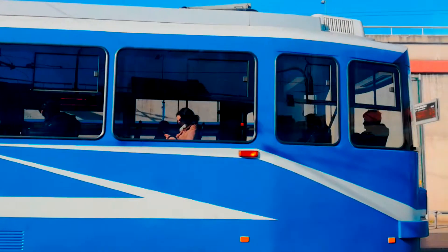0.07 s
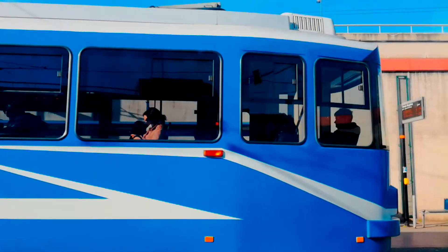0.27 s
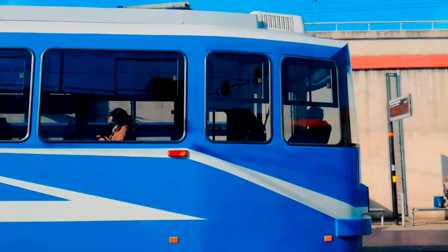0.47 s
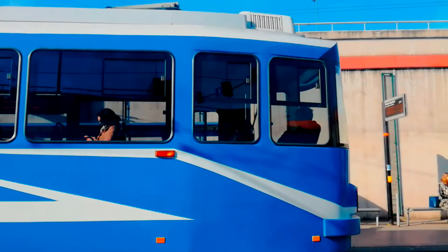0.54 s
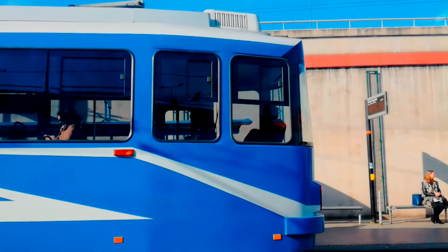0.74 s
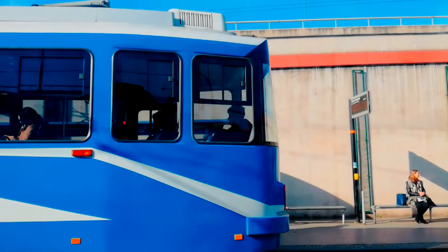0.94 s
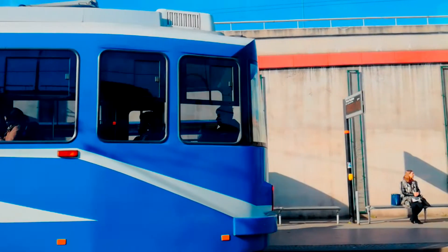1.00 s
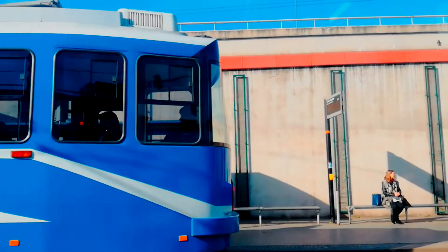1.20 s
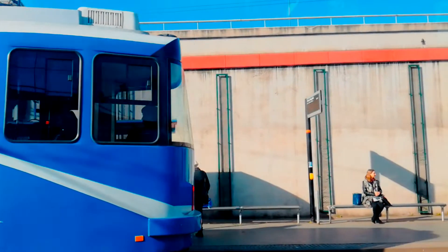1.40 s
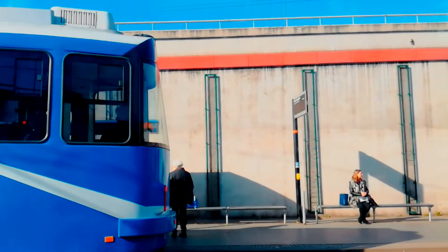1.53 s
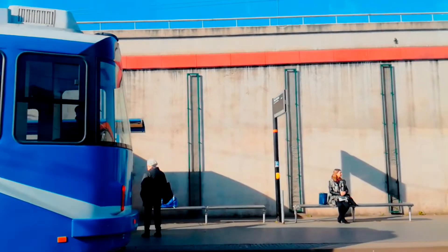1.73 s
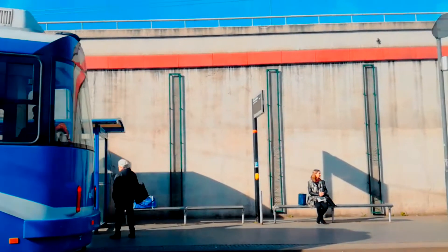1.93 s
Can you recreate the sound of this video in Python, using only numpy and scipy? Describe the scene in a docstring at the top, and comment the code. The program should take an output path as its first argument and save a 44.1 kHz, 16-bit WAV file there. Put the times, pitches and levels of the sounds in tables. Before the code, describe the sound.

A tram rumbles low and slowly on the left outdoors at a city stop; early on, a loud rattling clack hits very close to the right microphone, then a soft swish, and another later.

```python
"""Slow tram and a close clack

A tram rolls slowly on the left: shaped noise makes its low rumble, drone, rolling hiss and two short swishes.
Close on the right, contacts ring a damped part and loose parts rattle, so hard that the sound distorts.
Two sharp single-sample ticks fall among the contacts. The two microphones are a head's width apart:
the far one hears the sounds later and duller, but the ticks only fainter."""
import sys
import numpy as np
from scipy import signal
from scipy.fft import rfft, irfft, next_fast_len
from scipy.io import wavfile
from scipy.ndimage import map_coordinates

SR = 44100
rng = np.random.default_rng(int(sys.argv[2]) if len(sys.argv) > 2 else 0)


def pcm_store(signal):
    """Save signal as 16-bit PCM."""
    levels = np.round(np.clip(np.atleast_2d(signal), -1, 1) * 32767)
    wavfile.write(sys.argv[1], SR, levels.astype(np.int16).T)


N = 85995
TIME = np.arange(N) / SR


def amp(db):
    """Decibels to gain."""
    return 10 ** (np.asarray(db) / 20)


def unit(x):
    """Scale to rms 1."""
    return x / np.sqrt(np.mean(x ** 2) + 1e-20)


def along(points, hz):
    """Read a curve of (Hz, value) points on a log frequency axis."""
    point_hz, value = np.transpose(points)
    return np.interp(np.log(hz + 1), np.log(point_hz + 1), value)


def filtered(x, response):
    """Shape x by a complex response of frequency."""
    size = next_fast_len(N + SR // 2)
    spectrum = rfft(x, size) * response(np.fft.rfftfreq(size, 1 / SR))
    return irfft(spectrum, size)[..., :N]


def coloured(noise, spectrum):
    """Colour noise by a table of (Hz, dB) and scale it to rms 1."""
    return unit(filtered(noise, lambda hz: amp(along(spectrum, hz))))


def wobble(rate):
    """A smooth random curve, rate knots a second."""
    knots = rng.standard_normal(int(N * rate / SR) + 4)
    return map_coordinates(knots, [TIME * rate])


def swell(start, rise, fade_db_per_s):
    """A smooth rise in seconds, then a steady fade in dB."""
    t = TIME - start
    opening = np.sin(np.pi / 2 * np.clip(t / rise, 0, 1)) ** 2
    return opening * amp(-fade_db_per_s * np.maximum(t - rise, 0))


def grains(per_s):
    """Tiny impacts at random times and of random size."""
    return (rng.random(N) < per_s / SR) * rng.standard_normal(N)


EAR_LAG_S = .00054
BEND_HZ, BEND_RAD = 162, 0.91  # low sound bends round the head and lags further


def far_side(x, shadow):
    """The far microphone: sound travels round the head, so it is later and shadowed."""
    def response(hz):
        bend = BEND_RAD * hz ** 2 / (hz ** 2 + BEND_HZ ** 2)
        phase_lag = 2 * np.pi * hz * EAR_LAG_S + bend
        return amp(along(shadow, hz)) * np.exp(-1j * phase_lag)
    return filtered(x, response)


# The head's shadow on the far microphone for the tram. Each row: frequency in Hz, gain in dB.
TRAM_SHADOW = [(80, -0.76), (200, 1.5), (350, -2), (600, -6.5), (1100, -10), (2300, -16), (5000, -26.5),
               (12000, -14.5)]
# Likeness of the tram's noise at the two microphones. Each row: frequency in Hz, likeness from 0 to 1.
ALIKE = [(60, 1), (200, 1), (1000, 0.83), (5000, 0.88)]


def from_left(spectrum):
    """Coloured noise from the tram's side, rms 1 on the left and only partly alike on the right."""
    direct, diffuse = coloured(rng.standard_normal((2, N)), spectrum)
    alike = lambda hz: np.clip(along(ALIKE, hz), 0, 1)
    other = filtered(direct, alike) + filtered(diffuse, lambda hz: np.sqrt(1 - alike(hz) ** 2))
    return np.array([direct, far_side(other, TRAM_SHADOW)])


# Colour of the deep rumble. Each row: frequency in Hz, relative level in dB per Hz.
RUMBLE = [(15, -3), (35, 9), (52, -3.5), (70, -13), (125, -31.5), (400, -80)]
# Surges of the rumble. Each row: time in seconds, level in dB.
RUMBLE_LEVEL = [(0, -49), (.33, -46), (.72, -55), (.87, -47), (1.0, -59), (1.15, -51.5), (1.25, -54),
                (1.52, -50.5), (1.63, -42), (1.73, -51.5), (1.95, -51.5)]
# Colour of the steadier drone above it. Each row: frequency in Hz, relative level in dB per Hz.
DRONE = [(40, -21.5), (62, -0.5), (78, 2), (98, -4), (118, -18.5), (190, -19.5), (280, -30), (400, -35.5),
         (700, -66), (2000, -110)]
# Colour of the wheels' rolling noise. Each row: frequency in Hz, relative level in dB per Hz.
ROLLING = [(60, -20), (200, 2), (390, 1), (500, -4), (1150, -10.5), (2200, -23), (4700, -28), (7000, -39.5),
           (16000, -43)]
# Course of the rolling noise. Each row: time in seconds, level in dB.
ROLLING_LEVEL = [(0, -68.5), (.2, -70), (.6, -75), (.9, -75), (1.15, -76.5), (1.33, -76.5), (1.56, -78),
                 (1.638, -68), (1.73, -72), (1.95, -76)]
DRONE_DB, DRONE_FOLLOWS = -55, 0.18  # its middle level, and its share of the rumble's swings in dB


def tram():
    """The heavy body rumbles in surges under a steadier drone while the wheels roll on the rails."""
    rumble_db = np.interp(TIME, *np.transpose(RUMBLE_LEVEL))
    rolling_db = np.interp(TIME, *np.transpose(ROLLING_LEVEL))
    drone_db = DRONE_DB + DRONE_FOLLOWS * (rumble_db - rumble_db.mean())
    rumble = from_left(RUMBLE) * amp(rumble_db)
    drone = from_left(DRONE) * amp(drone_db)
    rolling = from_left(ROLLING) * amp(rolling_db + 0.41 * wobble(25))  # wavers slightly, in dB
    return rumble + drone + rolling


# Faint hum of the drive. Each row: frequency in Hz, rms level in dB.
HUM = [(253, -81), (393, -83), (1184, -95)]
HUM_WAVER_RAD = 0.91


def hum():
    """A few faint tones of the drive, each wavering in phase."""
    tones = np.zeros(N)
    for hz, db in HUM:
        phase = 2 * np.pi * hz * TIME + HUM_WAVER_RAD * wobble(4.1)
        tones += amp(db) * np.sqrt(2) * np.sin(phase)
    return np.array([tones, far_side(tones, TRAM_SHADOW)])


# Contacts of the clack. Each row: start in seconds, level in dB, contact time in ms.
CONTACTS = [(0.2308, -21.5, 3.7), (0.2362, -11.5, 0.76), (0.2418, -10.5, 0.4), (0.2484, -29.5, 0.2),
            (0.2503, -22, 1.5), (0.255, -32, 0.56), (0.2601, -22.5, 0.8), (0.2829, -29, 1.8),
            (0.2876, -23.5, 2.1), (0.2950, -25, 4.5)]
# Modes of the struck part. Each row: frequency in Hz, level in dB, time to fall 60 dB in seconds.
MODES = [(131, -18, 0.097), (199, -8, 0.032), (318.5, -16, 0.051), (372, -14, 0.026), (446, -19, 0.05),
         (531, -25, 0.047), (670, -22, 0.029), (755, -22, 0.023), (942, -23.5, 0.04), (1251, -13, 0.018),
         (1435, -19, 0.011), (1608, -26.5, 0.015), (1918, -24, 0.015), (2430, -33.5, 0.052),
         (3280, -31, 0.05), (4030, -39, 0.025)]
# Deep thuds of the clack. Each row: start in seconds, level in dB.
THUDS = [(0.2411, -10.5), (0.2741, -28), (0.2892, -31)]
CRACK_DB, CRACK_T60_S = -10.5, 0.026  # level of the white noise that is differenced into the crack
THUD_HZ, THUD_T60_S = 44, 0.031


def clack():
    """A quick run of contacts rings one damped part; its weight settles with deep thuds."""
    t = TIME[:SR // 4]
    ring = sum(amp(db - 60 * t / t60) * np.sin(2 * np.pi * hz * t) for hz, db, t60 in MODES)
    near = np.zeros(N)
    for start, db, contact_ms in CONTACTS:
        u = np.maximum(TIME - start, 0) / (contact_ms / 4000)  # force peaks a quarter of the way in
        force = u * np.exp(-u)
        bright_noise = np.diff(rng.standard_normal(len(t) + 1))
        crack = amp(CRACK_DB - 60 * t / CRACK_T60_S) * bright_noise
        near += amp(db) * signal.fftconvolve(force / force.sum(), ring + crack)[:N]
    for start, db in THUDS:
        age = np.maximum(TIME - start, 0)
        near -= amp(db - 60 * age / THUD_T60_S) * np.sin(2 * np.pi * THUD_HZ * age)
    return near


# Colour of the loose rattle. Each row: frequency in Hz, relative level in dB per Hz.
RATTLE = [(100, 7.5), (400, 4), (800, 1.5), (1200, -10.5), (1800, -13), (2600, -19.5), (4000, -29.5),
          (7000, -39.5), (15000, -58)]
RATTLE_S, RATTLE_RISE_S, RATTLE_DB, RATTLE_FADE_DB_PER_S = .235, 0.0029, -36.5, 260
RATTLE_PER_S = 2800  # impacts a second
RATTLE_HALF_S, RATTLE_STOP_S = 0.2934, 0.076  # midpoint and length of the ramp to rest
CRUNCH_S, CRUNCH_WIDTH_S, CRUNCH_DB, CRUNCH_HZ = .2405, 0.0031, -50, 3000


def rattle():
    """Loose parts crunch together, chatter ever more weakly and come to rest."""
    chatter = coloured(grains(RATTLE_PER_S), RATTLE)
    moving = np.clip((RATTLE_HALF_S - TIME) / RATTLE_STOP_S + .5, 0, 1)
    chatter *= amp(RATTLE_DB) * swell(RATTLE_S, RATTLE_RISE_S, RATTLE_FADE_DB_PER_S) * moving
    high_pass = lambda hz: 1j * hz / (CRUNCH_HZ + 1j * hz)
    crunch = unit(filtered(grains(RATTLE_PER_S), high_pass))
    burst = np.exp(-((TIME - CRUNCH_S) / CRUNCH_WIDTH_S) ** 2)
    return chatter + crunch * amp(CRUNCH_DB) * burst


SQUEAK_END_S, SQUEAK_HZ, SQUEAK_RISE_HZ_PER_S, SQUEAK_DB = .2421, 1591, 200000, -27  # pitch at its peak
SQUEAK_SWELL_S, SQUEAK_STOP_S = 0.0025, 0.00045


def squeak():
    """A few milliseconds of rising stick-slip as parts slide home, swelling until they stop."""
    t = np.clip(TIME - SQUEAK_END_S, -.05, .05)  # it is silent beyond these limits
    shape = np.where(t < 0, t / SQUEAK_SWELL_S, t / SQUEAK_STOP_S)
    level = np.exp(-shape ** 2)
    cycles = SQUEAK_HZ * t + SQUEAK_RISE_HZ_PER_S * t ** 2 / 2
    return amp(SQUEAK_DB) * level * np.cos(2 * np.pi * cycles)


# The head's shadow on the far microphone for the clack. Each row: frequency in Hz, gain in dB.
CLACK_SHADOW = [(60, 1), (300, -1.5), (640, -8), (1400, -12.5), (3000, -17.5), (7000, -28.5), (16000, -33)]
SQUASH_TOP, SQUASH_HARDNESS = 0.097, 3.4  # amplitude at which peaks flatten, sharpness of the knee


def squashed_on_right(x):
    """A sound from close on the right, so hard that its peaks are flattened."""
    near = x / (1 + np.abs(x / SQUASH_TOP) ** SQUASH_HARDNESS) ** (1 / SQUASH_HARDNESS)
    return np.array([far_side(near, CLACK_SHADOW), near])


TREBLE_LIFT, LIFT_HZ = 0.27, 1187  # gain added at the very top, and the corner of the shelf
# Dry ticks. Each row: time in seconds, peak level in dB.
TICKS = [(0.2486, -38.5), (0.2686, -18)]
TICK_FAR_DB = -20


def tick():
    """Dry single-sample snaps with no ring, right at the right microphone."""
    snap = np.zeros(N)
    for start, db in TICKS:
        snap[round(start * SR)] = -amp(db)
    return np.array([amp(TICK_FAR_DB) * snap, snap]) / (1 + TREBLE_LIFT)  # makes room for the lift


# The swishes. Each row: start in seconds, level in dB, rise in seconds, fade in dB per second,
# start of the low body in seconds, its level in dB, start of the hiss in seconds, its level in dB.
SWISHES = [(0.309, -59.5, 0.043, 95, 0.28, -62.5, 0.3015, -72.5),
           (1.34, -59, 0.12, 76.5, 1.363, -55.5, 1.384, -70)]
# Colours of the rush, the hiss and the low body. Each row: frequency in Hz, relative level in dB per Hz.
SWISH_RUSH = [(150, -9.5), (390, 4.5), (680, -2.5), (1050, 0), (1500, -7.5), (2200, -13.5), (3200, -18),
              (5000, -25), (8000, -55)]
SWISH_HISS = [(1200, -7.5), (2300, 0), (3100, 4), (4000, -2), (5100, -2.5), (7000, -13), (11000, -21.5),
              (16000, -47)]
SWISH_BODY = [(50, -10), (150, 1), (260, 2.5), (420, -10.5), (620, -14), (1500, -66)]
HISS_RISE_S, HISS_FADE_DB_PER_S = 0.05, 133
BODY_RISE_S, BODY_FADE_DB_PER_S = 0.02, 27.5


def swishes():
    """Each swish is a soft rush of noise with a short bright hiss and a low body that lingers."""
    out = np.zeros((2, N))
    for start, db, rise, fade, body_start, body_db, hiss_start, hiss_db in SWISHES:
        out += from_left(SWISH_RUSH) * amp(db) * swell(start, rise, fade)
        out += from_left(SWISH_HISS) * amp(hiss_db) * swell(hiss_start, HISS_RISE_S, HISS_FADE_DB_PER_S)
        out += from_left(SWISH_BODY) * amp(body_db) * swell(body_start, BODY_RISE_S, BODY_FADE_DB_PER_S)
    return out


def scene():
    """The tram on the left; the clack, its rattle and squeak, and the ticks on the right."""
    left = tram() + hum() + swishes()
    return left + squashed_on_right(clack() + rattle() + squeak()) + tick()


EDGE_S = .004  # fade at both ends
SELF_NOISE_DB, TOP_HZ = -91, 16500


def record(dry):
    """A shelf lifts the treble, faint self-noise is added and the top of the band is cut."""
    fade = np.clip(np.minimum(TIME, TIME[-1] - TIME) / EDGE_S, 0, 1)
    bright = filtered(dry * fade, lambda hz: 1 + TREBLE_LIFT * 1j * hz / (LIFT_HZ + 1j * hz))
    noise_colour = [(2000, 7), (9000, 4.0), (13000, -5.5), (16000, -18)]  # Hz, relative dB per Hz
    self_noise = coloured(rng.standard_normal((2, N)), noise_colour)
    band_limit = lambda hz: np.clip((TOP_HZ - hz) / 700 + .5, 0, 1)
    return filtered(bright + amp(SELF_NOISE_DB) * self_noise, band_limit)


dry = scene()
out = record(dry)
pcm_store(out)
```